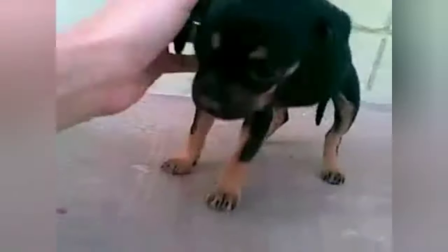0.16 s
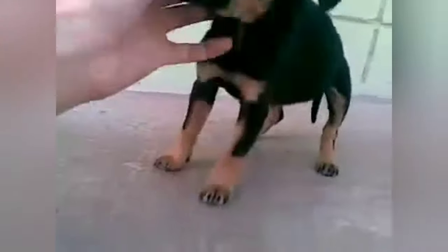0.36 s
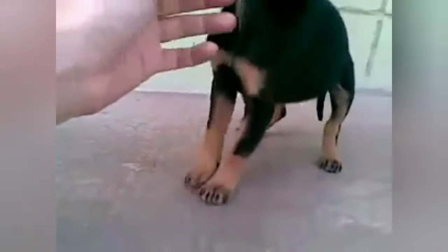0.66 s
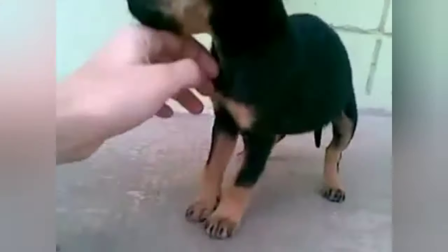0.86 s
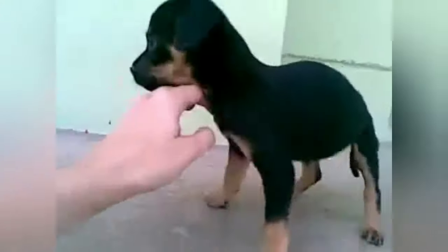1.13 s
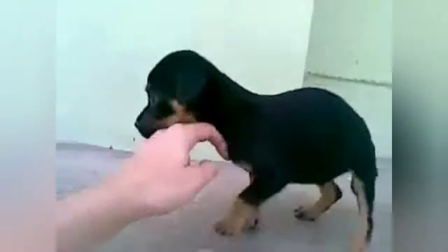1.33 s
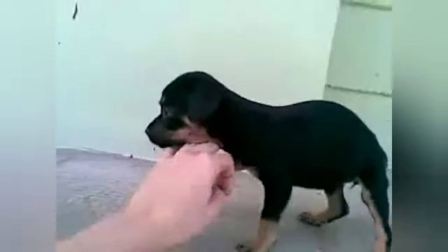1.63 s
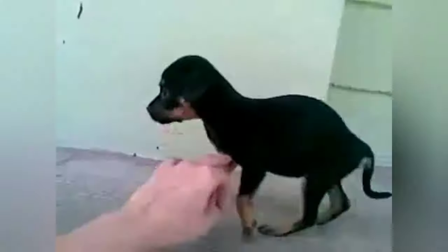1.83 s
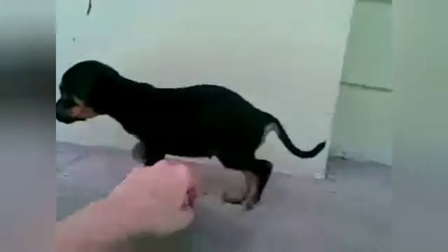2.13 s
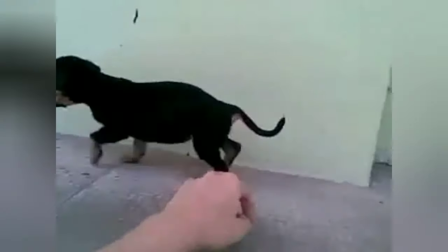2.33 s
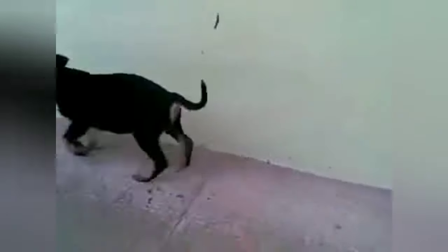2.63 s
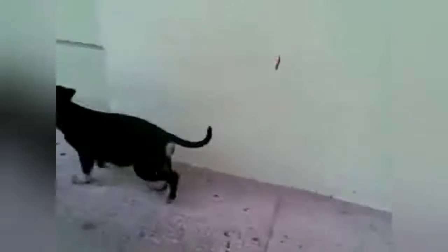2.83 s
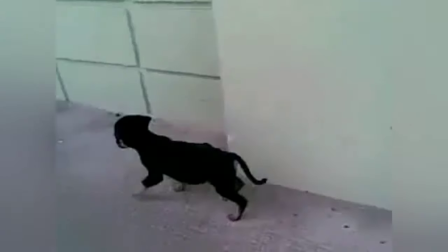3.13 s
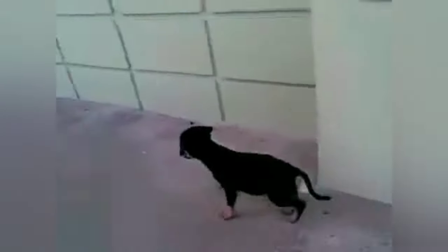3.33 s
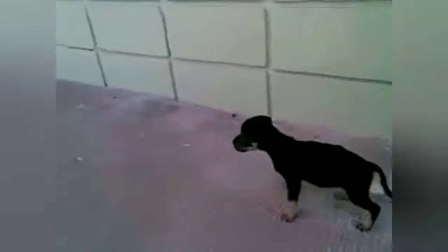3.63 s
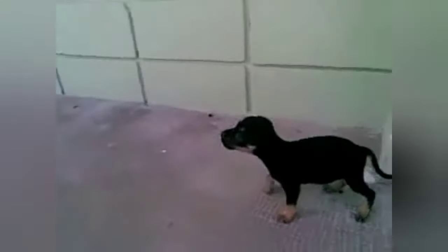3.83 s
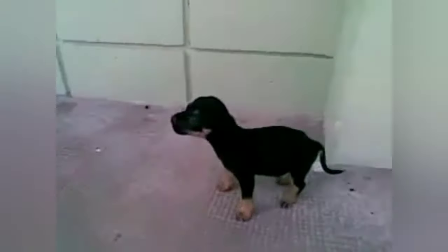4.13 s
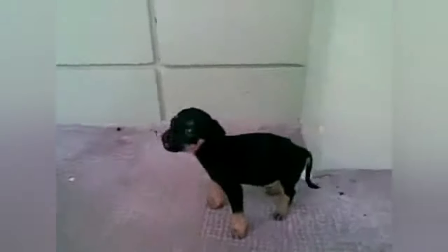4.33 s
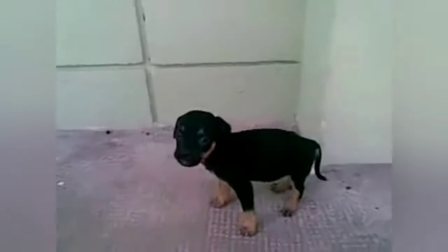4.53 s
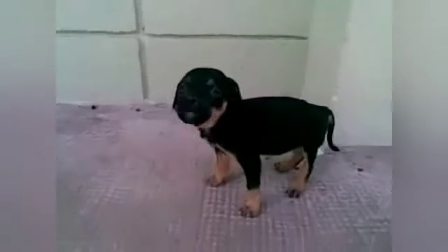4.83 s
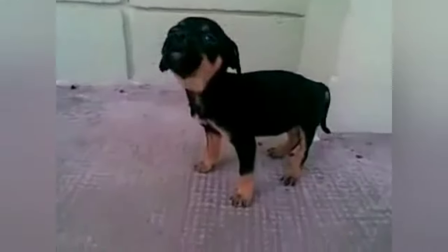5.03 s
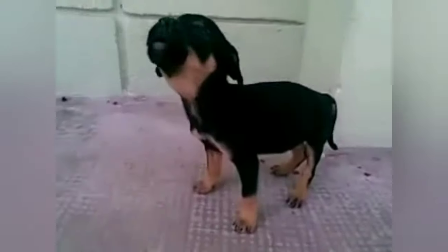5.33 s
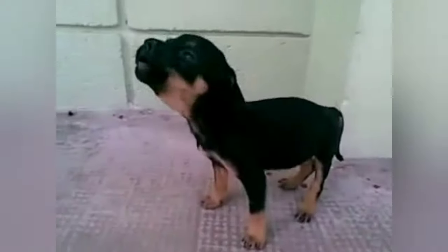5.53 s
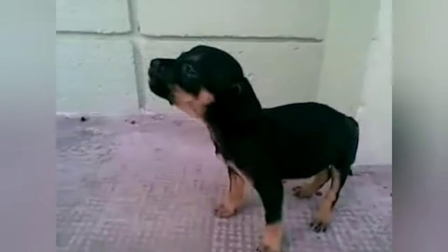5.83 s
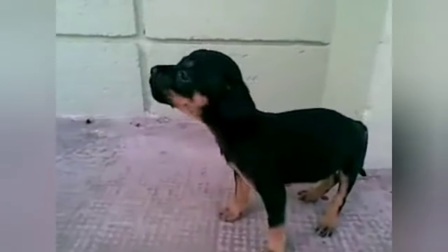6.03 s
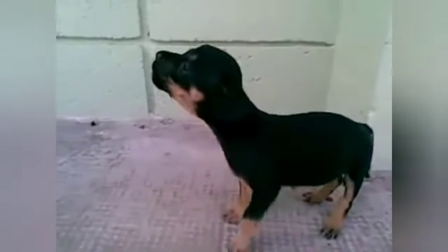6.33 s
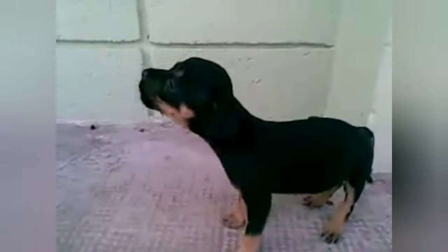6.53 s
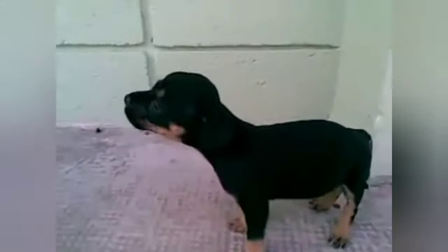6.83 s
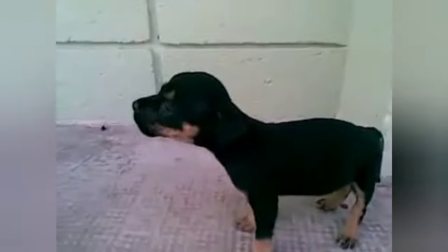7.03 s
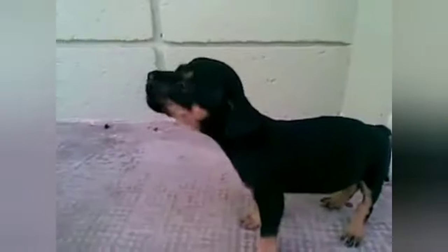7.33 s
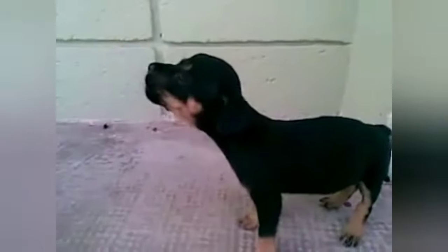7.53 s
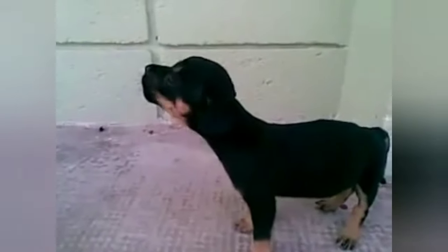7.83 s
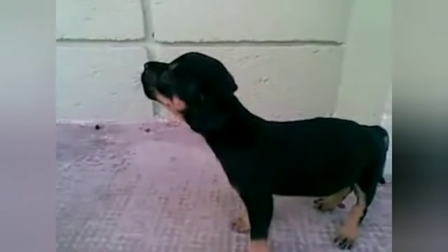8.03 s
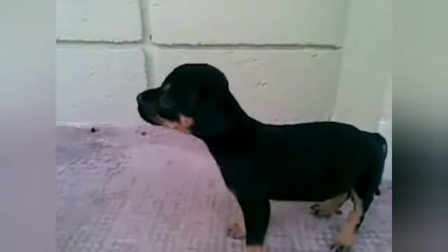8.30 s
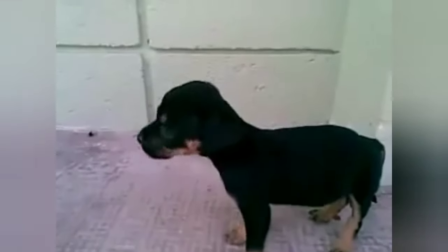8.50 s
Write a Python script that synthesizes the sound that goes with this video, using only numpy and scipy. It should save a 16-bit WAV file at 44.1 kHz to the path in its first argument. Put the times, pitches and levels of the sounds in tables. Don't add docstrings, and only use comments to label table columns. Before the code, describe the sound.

Close, thin puppy whines and sharp yelps on a bare concrete floor, with distant echoing barks, a few claw taps and dull street rumble.

```python
import sys
import numpy as np
from scipy import signal
from scipy.fft import rfft, irfft, next_fast_len
from scipy.io import wavfile
from scipy.ndimage import uniform_filter1d, map_coordinates

SR = 44100
rng = np.random.default_rng(int(sys.argv[2]) if len(sys.argv) > 2 else 0)


def inscribe(sig):
    pcm = np.round(np.clip(np.atleast_2d(sig).T, -1, 1) * 32767)
    wavfile.write(sys.argv[1], SR, pcm.astype(np.int16))


def makeup_ratio(level_db):
    decades = np.asarray(level_db, float) / 20
    return 10 ** decades


N = 381906


def unit(x):
    return x / np.sqrt(np.mean(x ** 2) + 1e-20)


def along(points, hz):
    f, v = np.transpose(points)
    return np.interp(np.log(hz + 1), np.log(f + 1), v)


def curves(rows, t):
    s, *cols = np.transpose(rows)
    return [np.interp(t, s, c) for c in cols]


def wobble(rate, size=N):
    coarse = np.arange(0, size + 32, 32)
    knots = map_coordinates(rng.standard_normal(size // 100 + 4), [coarse * min(rate, 400) / SR])
    return np.interp(np.arange(size), coarse, knots)


def filtered(x, response):
    m = next_fast_len(len(x) + 8192)
    return irfft(rfft(x, m) * response(np.fft.rfftfreq(m, 1 / SR)), m)[:len(x)]


def resonance(f, hz, width_hz):
    return 1j * f * width_hz / (hz * hz - f * f + 1j * f * width_hz)


def rush(spectrum, patchy_db):
    z = signal.stft(rng.standard_normal(N + 512), nperseg=512)[2]
    field = uniform_filter1d(uniform_filter1d(rng.standard_normal(z.shape), 5, 0), 12, 1)
    noise = signal.istft(z * makeup_ratio(patchy_db * unit(field)), nperseg=512)[1][:N]
    return unit(filtered(noise, lambda hz: makeup_ratio(along(spectrum, hz))))


def echoes(x, decay):
    hz, t, z = signal.stft(rng.standard_normal(SR), SR, nperseg=256)
    tail = signal.istft(z * makeup_ratio(-60 * t / along(decay, hz)[:, None]), SR, nperseg=256)[1][:SR]
    return signal.fftconvolve(x, tail / np.linalg.norm(tail))


def street(voice):
    # f/Hz, level/dB per Hz
    rumble_spectrum = [(8.8, -33), (15, -5), (32, -1), (80, 7.5), (103, 2), (130, -3), (173, -7.5),
                       (275, -10), (300, -20), (390, -36), (660, -120)]
    # f/Hz, level/dB per Hz
    traffic_spectrum = [(120, -25.5), (200, -32), (347, -1), (410, -4.5), (528, -4.5), (655, -8.5),
                        (904, -13), (983, -14), (1080, -14), (3500, -30.5), (4550, -38.5), (7700, -120)]
    # f/Hz, level/dB per Hz
    hiss_spectrum = [(1470, -13.5), (2500, 2.5), (3650, -2.5), (4930, -4.5), (7780, -6.5), (9310, -4),
                     (9710, -9.5), (10100, -52), (10500, -26.5), (13600, -83), (22000, -120)]
    # f/Hz, level over the traffic/dB
    hum_lines = [(178, -17), (352, -11), (440, -20), (528, -9), (716, -14), (900, -16.5)]
    # level/dB, ducking at full voice/dB, memory/s
    layers = [
        (-42.5, 2.5, 0.58),
        (-45, 9, 0.41),
        (-65.5, 12, 0.12),
    ]
    duck_from_db, duck_full_db = -39, -12.5
    recede_db_per_s, lag_s = 0.45, 0.13
    t = np.arange(N) / SR
    late_power = np.roll(voice, round(lag_s * SR)) ** 2

    def ducked(db, depth_db, memory):
        power = np.abs(uniform_filter1d(late_power, round(memory * SR)))
        loud_db = 10 * np.log10(power + 1e-12)
        duck = np.clip((loud_db - duck_from_db) / (duck_full_db - duck_from_db), 0, 1.2)
        return db - recede_db_per_s * (t - t.mean()) - depth_db * duck

    rumble_db, traffic_db, hiss_db = [ducked(*layer) for layer in layers]
    hum = sum(makeup_ratio(db + 3.7 * wobble(5.4)) * np.sin(2 * np.pi * hz * t + 1.4 * wobble(7.7))
              for hz, db in hum_lines)
    rumble = makeup_ratio(rumble_db + 3.0 + 0.6 * wobble(4.5)) * rush(rumble_spectrum, patchy_db=1.4)
    traffic = makeup_ratio(traffic_db) * (rush(traffic_spectrum, patchy_db=2.5) + np.sqrt(2) * hum)
    return rumble + traffic + makeup_ratio(hiss_db) * rush(hiss_spectrum, patchy_db=5)


def yip(s, top, end, db, mouth_db):
    rise_s, start_share, soft_db, fade_db, upper_db = 0.048, 0.74, 7, 8, -60.5
    fall = 0.06 * top / 1000
    shape = [(s - rise_s, start_share * top, db - soft_db),
             (s, top, db),
             (s + 0.33 * fall, end + 0.42 * (top - end), db - 0.41 * fade_db),
             (s + fall, end, db - fade_db)]
    return [(*row, mouth_db, upper_db - db) for row in shape]


def spell(t, start, end):
    return np.clip(np.minimum(t - start, end - t) / 0.025 + .5, 0, 1)


def mouth(t, hz):
    # start t/s, widest t/s, end t/s, peak level/dB, f/Hz
    gapes = [(2.688, 2.757, 3.0, -63, 5800), (3.016, 3.073, 3.146, -45, 5200),
             (3.096, 3.194, 3.6, -60, 5820), (3.426, 3.49, 3.66, -43, 4250), (3.49, 3.56, 3.72, -53, 5600),
             (4.45, 4.718, 4.8, -55.5, 2810), (4.9, 5.023, 5.17, -57, 4520), (6.95, 7.12, 7.4, -46, 2290),
             (8.219, 8.4, 8.66, -63, 4050), (8.36, 8.48, 8.6, -60, 2780), (5.93, 6.028, 6.12, -39, 4400),
             (6.04, 6.076, 6.13, -49, 3220), (6.25, 6.505, 6.62, -34, 2660),
             (6.706, 7.055, 7.2, -38.5, 3140), (7.05, 7.155, 7.25, -49, 3690),
             (7.848, 7.932, 8.3, -56, 2330)]
    swell_db = 25
    size = 0
    for start, widest, end, db, gape_hz in gapes:
        if t[0] < end and start < t[-1]:
            width_hz = (0.4 if gape_hz > 4000 else 0.085) * gape_hz
            closed = np.interp(t, [start, widest, end], [1, 0, 1])
            during = (start < t) * (t < end)
            size = size + makeup_ratio(db - swell_db * closed) * during * np.abs(resonance(hz, gape_hz, width_hz)) ** 2
    return size


def ring_db(t, hz):
    # start t/s, end t/s, f/Hz, level/dB
    rings = [(3.7, 4.62, 6250, 11.5), (4.15, 4.6, 8000, 6.5), (3.5, 4.3, 6400, -7), (5.15, 8.7, 4400, -5.5),
             (6.5, 6.82, 8150, 5), (6.25, 6.48, 9200, 4), (5.99, 6.055, 8900, 4), (6.05, 6.11, 7450, 13),
             (5.96, 6.02, 7200, 8), (6.12, 7.05, 7500, -10), (6.12, 6.75, 9700, -7), (5.2, 6.0, 7300, 3),
             (6.6, 7.9, 4850, 6.5), (8.25, 8.64, 7960, -16), (6.7, 8.47, 6000, -12), (6.3, 7.05, 5600, 7),
             (3.1, 3.66, 7400, 8), (3.095, 3.16, 6600, -15), (3.035, 3.056, 5300, -14),
             (3.035, 3.056, 4000, -10), (3.035, 3.056, 6700, -10), (3.12, 3.2, 3900, -10),
             (3.18, 3.29, 4500, -8), (3.42, 3.46, 5900, -7), (3.44, 3.495, 5500, -16),
             (3.46, 3.478, 7000, 6), (3.48, 3.495, 7100, 6), (3.6, 3.65, 7200, 8), (3.6, 3.72, 5700, -10),
             (3.61, 3.65, 4750, 7), (3.2, 3.9, 9300, -12), (4.9, 5.95, 8700, -17), (5.06, 5.15, 9600, -5),
             (.65, .95, 2750, -12), (.65, .95, 4750, 5), (.65, .95, 5800, -10), (.04, .26, 4600, 5),
             (6.75, 7.02, 2420, -12), (6.525, 6.55, 2480, -8), (5.3, 6.05, 4250, 7),
             (5.2, 5.97, 5000, -8.5), (4.97, 5.07, 6330, 9), (4.99, 5.04, 5600, -10), (2.7, 2.8, 5300, -12),
             (3.9, 6.0, 3700, 3), (5.3, 5.6, 7200, -8), (8.45, 8.6, 2900, 5), (7.05, 7.2, 5000, -8),
             (6.07, 6.13, 4200, -10)]
    width = 0.079
    return sum(db * spell(t, start, end) * np.exp(-(np.log(hz / ring_hz) / width) ** 2)
               for start, end, ring_hz, db in rings if t[0] < end and start < t[-1])


def tripling(t, partial, second_db):
    # start t/s, end t/s, level under 2nd partial/dB, extra above it/dB
    spells = [
        (3.846, 4.724, -11, -8.5),
        (5.199, 5.771, -15.5, -0.5),
        (6.122, 6.479, -14.5, -3.5),
    ]
    # thirds of the pitch, level/dB
    sidebands = [(4, -16), (5, 0), (7, -13), (8, -8), (10, -28)]
    blur = 1.2 * np.cos(.85 * wobble(60, size=len(t)))
    lines = 0
    for begin, end, side_db, above_db in spells:
        if t[0] < end and begin < t[-1]:
            comb = sum(partial(k / 3, second_db + side_db + (k > 6) * above_db + db, 2.4) for k, db in sidebands)
            lines = lines + blur * spell(t, begin, end) * comb
    return lines


def vocal_call(rows, nasal_db, air, t):
    # f/Hz, level under the call/dB
    nose = [(1900, -11), (2400, -17.5), (2800, -25), (3150, -27.5), (3700, -47.5), (4100, -65.5),
            (4700, -48), (9000, -92)]
    # f/Hz, level/dB
    muzzle = [(3000, -2), (4400, 0), (5300, -3), (6200, 1), (7200, -4), (8200, -2), (9000, -1), (9700, -8)]
    shrill_hz, shrill_loss_db, shrill_top_hz = 1122, 15.5, 7700
    smear_loss_db, smear_per_s = 2, 12
    steady_db, unsteady_db = 1.5, 2.3
    hoarse = .24
    size = len(t)
    hz, level_db, mouth_db, effort_db = curves(rows, t)
    first_db = level_db - 10 * np.log10(1 + makeup_ratio(mouth_db) ** 2)
    second_db, upper_db = first_db + mouth_db, level_db + effort_db

    slope = np.gradient(np.log(hz)) * SR
    glide = np.clip(uniform_filter1d(np.abs(slope), 2000) / 0.54, 0, 1)
    smear_db = smear_loss_db * np.clip(uniform_filter1d(slope, 600) / smear_per_s, 0, 1)
    jitter = .002 * wobble(40, size=size) + (0.002 + .005 * glide) * wobble(200, size=size)
    hz = uniform_filter1d(hz, 450) * (1 + jitter)
    phase = 2 * np.pi * np.cumsum(hz) / SR

    def partial(k, db, shake_db):
        level = makeup_ratio(db + shake_db * wobble(44.83, size=size))
        return np.sqrt(2) * level * np.sin(k * phase + k * k)

    call = partial(1, first_db, 1.0) + partial(2, second_db, 1.0)
    rasp = 1 + hoarse * glide * (1.5 * wobble(260, size=size) - 1)
    for k in range(3, 6):
        middle = makeup_ratio(level_db + nasal_db + along(nose, k * hz)) * (k < 5) + mouth(t, k * hz)
        drift_db = 3 * glide * wobble(18, size=size) - 2 * glide - smear_db * (k > 3)
        call += rasp * middle * partial(k, ring_db(t, k * hz) + drift_db, 1.3 + 1.7 * glide)

    shrill_db = shrill_loss_db * np.clip((hz - shrill_hz) / 60, 0, 1)
    sway_db = steady_db + unsteady_db * glide
    for k in range(5, 14):
        db = upper_db - smear_db - 8.0 - shrill_db * (k * hz > shrill_top_hz)
        db = db + along(muzzle, k * hz) + ring_db(t, k * hz)
        db = db + sway_db * np.clip(wobble(9.2, size=size), -3, 1)
        call += rasp * partial(k, db, sway_db) * (k * hz < 9700)

    call += tripling(t, partial, second_db)
    call += makeup_ratio(upper_db - 20 + 12 * glide) * air
    call *= 1 + makeup_ratio(-24.5) * unit(uniform_filter1d(rng.standard_normal(size), 40))
    return call * np.minimum(1, np.minimum(t - t[0], t[-1] - t) / .008)


def puppy():
    # f/Hz, level/dB per Hz
    breath = [(1800, -54.5), (3000, -14.5), (4500, -15.5), (7000, 1), (9300, -10), (9800, -64.5)]
    # f/Hz, decay t60/s
    nook = [(500, 0.8), (3000, 0.47), (9000, 0.01)]
    # top t/s, top f/Hz, end f/Hz, level/dB, mouth opening/dB
    yips = [
        (1.714, 854, 745, -37, -9.5),
        (2.055, 1126, 1054, -40, -18),
        (2.416, 1063, 872, -43, -7),
        (2.751, 1380, 1008, -42.5, -18),
    ]
    # t/s, f/Hz, level/dB, mouth opening (2nd over 1st partial)/dB, effort (upper over level)/dB
    whimper_1 = [(.034, 1048, -31, -27, -37), (.05, 925, -31, -26, -35), (.1, 970, -32, -20, -34),
                 (.16, 889, -32.5, -8, -27), (.232, 874.4, -29, -13.5, -28.5),
                 (.256, 843, -53, -7.5, -13.5)]
    # t/s, f/Hz, level/dB, mouth opening/dB, effort/dB
    whimper_2 = [(.66, 782, -44, -32, -36), (.68, 692, -31, -37, -43.5), (0.726, 663, -29, -36, -43.5),
                 (0.744, 770, -30, -20, -48), (0.758, 705, -26.5, -30, -41), (.8, 705, -28, -35, -37),
                 (0.864, 679, -29, -41, -38.5), (.904, 659, -30.5, -49, -30.5), (0.943, 633, -54, -27, -18)]
    # t/s, f/Hz, level/dB, mouth opening/dB, effort/dB
    whimper_3 = [(7.745, 936, -40.5, 1, -30), (7.772, 1014, -45, 2, -28), (7.8, 1015, -45, 13, -17.5),
                 (7.885, 789, -35, -2.5, -32), (7.956, 756, -38, -7, -25.5), (7.968, 780, -66, -7, -28)]
    # t/s, f/Hz, level/dB, mouth opening/dB, effort/dB
    whimper_4 = [(8.241, 934, -55, -11, -15.5), (8.26, 955, -36, -9.5, -24.5),
                 (8.297, 1053, -40.5, -2.5, -11.5), (8.409, 918, -36, 19, -16.5),
                 (8.456, 917, -35, 21, -17), (8.521, 969, -35, 10, -19), (8.586, 1017, -37, -2.5, -15.5),
                 (8.597, 949, -39.5, 5, -16.5), (8.614, 925, -37.5, 5, -17.5), (8.63, 870, -64, -23, -23)]
    # t/s, f/Hz, level/dB, mouth opening/dB, effort/dB
    yelp_1 = [(3.011, 1185, -63, -3, -4), (3.028, 1205, -44, -6, -5.5), (3.048, 1362, -34, -15, -21),
              (3.061, 1483, -27, -18, -27.5), (3.074, 1478, -29.5, -16.5, -30),
              (3.128, 1286, -44, -23, -14.5), (3.231, 1103, -40, -34, -19), (3.286, 1064, -42, -20, -26)]
    # t/s, f/Hz, level/dB, mouth opening/dB, effort/dB
    yelp_2 = [(3.424, 1046, -41.5, -23, -14), (3.445, 1082, -36, -15, -12.5),
              (3.476, 1356, -24, -14.5, -21.5), (3.497, 1517, -29.5, -26, -15),
              (3.51, 1518, -35.5, -28.5, -17), (3.555, 1397, -33.5, -17.5, -16),
              (3.628, 1193, -42, -17.5, -13), (3.69, 1053, -37.5, -24, -23.5),
              (3.766, 1040, -42.5, -40, -24)]
    # t/s, f/Hz, level/dB, mouth opening/dB, effort/dB
    whine_1 = [(3.805, 1056, -22.5, -22, -28.5), (3.865, 1034, -29, -6, -28), (3.96, 1025, -26, -9.5, -32),
               (4.085, 1020, -24, -16.5, -36.5), (4.429, 988, -23.5, -14, -36.5),
               (4.648, 955, -27, -12.5, -40.5), (4.72, 935, -36, -1, -35), (4.779, 936, -45, -29, -41)]
    # t/s, f/Hz, level/dB, mouth opening/dB, effort/dB
    yip_into_whine = [(4.935, 952, -54, -1, -21), (4.965, 1040, -49.5, -9, -11), (5.0, 1109, -53, 0, -10.5),
                      (5.05, 1122, -52, -3, -8), (5.095, 1003, -46.5, -8, -21.5)]
    # t/s, f/Hz, level/dB, mouth opening/dB, effort/dB
    whine_2 = [(5.136, 911, -40, -9.5, -37.5), (5.203, 956, -30, 0.5, -39),
               (5.377, 934, -26.5, -3.5, -38.5), (5.436, 922, -28.5, 2.5, -40),
               (5.616, 916.3, -28.5, 0.5, -37.5), (5.739, 916, -33, 5, -42), (5.811, 820, -57, -29.5, -33)]
    # t/s, f/Hz, level/dB, mouth opening/dB, effort/dB
    yelp_3 = [(5.965, 848, -54.5, -26, -32), (5.992, 1002, -45.5, 21.5, -1.5), (6.012, 1113, -36.5, -5, -9),
              (6.045, 1115, -34.5, 14, -13.5), (6.079, 1066, -27, 12.5, -26.5),
              (6.124, 1032, -38.5, 0.5, -31), (6.15, 981, -32.5, 21.5, -29.5)]
    # t/s, f/Hz, level/dB, mouth opening/dB, effort/dB
    whine_3 = [(6.249, 959, -28.5, 7, -36.5), (6.4, 924, -27.5, 12.5, -37), (6.508, 888, -24.5, 6, -36.5),
               (6.528, 826, -22.5, 11, -43), (6.707, 801, -31, 1, -39), (6.992, 809, -29, 5, -40.5),
               (7.066, 782.5, -37, 13.5, -30.5), (7.116, 765, -33.5, -3.5, -32), (7.211, 694, -44, -4, -33)]
    whimpers = [whimper_1, whimper_2, whimper_3, whimper_4, yelp_1] + [yip(*row) for row in yips]
    whines = [yelp_2 + whine_1, yip_into_whine + whine_2, yelp_3 + whine_3]
    calls = [(rows, -10.5) for rows in whimpers]
    calls += [(rows, 0) for rows in whines]
    voice, air = np.zeros(N), rush(breath, patchy_db=4)
    for rows, nasal_db in calls:
        start, size = round(rows[0][0] * SR), round((rows[-1][0] - rows[0][0]) * SR)
        t = (start + np.arange(size)) / SR
        voice[start:start + size] += vocal_call(rows, nasal_db, air[start:start + size], t)
    return voice + makeup_ratio(-21) * echoes(voice, nook)[:N]


def far_dogs():
    # t/s, level/dB, length/s, throat f/Hz, mouth f/Hz
    hoarse_barks = [(8.018, -54, 0.08, 985, 710), (0.443, -38.5, 0.18, 712, 365),
                    (0.461, -40.5, 0.25, 488.6, 775), (2.041, -33.5, 0.12, 639, 366),
                    (3.722, -30, 0.19, 664.5, 1200), (3.998, -38.5, 0.065, 458.6, 690),
                    (4.649, -37, .13, 898.7, 1083), (7.409, -33, 0.11, 715, 1383),
                    (8.297, -44.5, 0.21, 950, 1350), (5.876, -39, 0.2, 641.5, 412),
                    (6.115, -38, 0.21, 611.6, 387), (6.33, -27.5, 0.14, 876.8, 1650),
                    (7.322, -29, 0.0975, 791.5, 1027), (7.524, -28.5, .19, 684.6, 1045),
                    (8.146, -40.5, 0.14, 847, 1035), (8.187, -28, .11, 822, 1360),
                    (8.207, -35, 0.086, 1152, 1650), (8.385, -40.5, 0.22, 410, 756)]
    # t/s, level/dB, throat f/Hz, throat width/Hz, mouth f/Hz
    woofs = [(.66, -43, 372, 151, 523), (2.11, -33.5, 449.7, 176, 584), (4.641, -36.5, 423, 100.3, 843),
             (4.7, -35, 417.9, 60.6, 744), (4.9, -51, 426.4, 44.7, 916), (6.7, -39, 425, 186.4, 1056),
             (7.169, -43.5, 447.2, 199.5, 752), (7.559, -35, 514, 71, 710)]
    # f/Hz, decay t60/s
    yard = [(300, 1.0), (1000, 1), (2500, 0.22), (6000, 0.73)]
    bark_width_hz, woof_s = 300, 0.1703
    calls = [(*row, bark_width_hz) for row in hoarse_barks]
    calls += [(s, db, woof_s, hz, mouth_hz, width_hz) for s, db, hz, width_hz, mouth_hz in woofs]
    barks, t = np.zeros(N + 2 * SR), np.arange(SR // 2) / SR
    for s, db, length, throat_hz, mouth_hz, width_hz in calls:
        u = np.clip(t / length, 0, 1)
        pitch_hz = throat_hz / np.ceil(throat_hz / 550)
        arch = .86 + .2 * np.sin(np.pi * u ** .8) + 0.0615 * wobble(149.4, size=len(t))
        cycles = np.cumsum(pitch_hz * arch) / SR
        gate = np.exp(4 * (np.cos(2 * np.pi * cycles) - 1))
        pulses = unit(gate ** 6 - np.mean(gate ** 6))
        source = pulses + 4.83 * unit(gate * rng.standard_normal(len(t)))

        def tract(f):
            upper = 0.4 * resonance(f, mouth_hz, 280) ** 2 - 0.069 * resonance(f, 1470, 600)
            upper = upper + 0.064 * resonance(f, 2240, 400) - 0.0095 * resonance(f, 2700, 1100)
            throat = resonance(f, throat_hz, width_hz) ** 2
            lips = f ** 2 / (f ** 2 + 300 ** 2)
            return (throat - np.sqrt(width_hz / bark_width_hz) * upper) * lips

        bark = unit(filtered(source, tract)) * np.sin(np.pi * u ** .62) ** 1.1
        heard = echoes(bark, yard)
        heard[:len(t)] += 0.63 * bark
        barks[round(s * SR):][:len(heard)] += makeup_ratio(db + 1.0) * heard
    return barks[:N]


def paws():
    # t/s, peak level/dB, f/Hz, decay t60/s
    claws = [
        (2.953, -46, 484, 0.043),
        (3.322, -27.5, 1614, 0.016),
        (3.343, -40, 6030, 0.0045),
        (3.428, -35.5, 2100, 0.0098),
        (4.662, -22, 326.4, 0.21),
        (5.248, -26, 293.4, 0.12),
        (7.38, -39.5, 1520, 0.0094),
    ]
    # t/s, half length/s, level/dB
    scuff = (3.322, .026, -65)
    taps, t = np.zeros(N), np.arange(6000) / SR
    for s, db, hz, t60 in claws:
        onset = 1 - np.exp(-t / (.1 * t60))
        taps[round(s * SR):][:len(t)] += makeup_ratio(db - 60 * t / t60) * np.sin(2 * np.pi * hz * t) * onset
    s, width, db = scuff
    rustle = rush([(7000, -40), (9300, -6), (10000, 0), (10800, -1), (11300, -8), (11700, -60)], patchy_db=2)
    return taps + makeup_ratio(db) * rustle * np.exp(-((np.arange(N) / SR - s) / width) ** 6)


def masking(x, above_hz, below_hz):
    # f/Hz, level/dB
    masked = [(1100, -50), (1250, -39), (2050, -40), (2250, -33), (2700, -32), (3500, -31), (4600, -28),
              (6600, -23.5), (7200, -16), (7800, -12), (8600, -13), (9300, -18), (9750, -17), (9900, -32)]
    # f/Hz, level/dB
    starved = [(3000, -90), (3600, -70), (5000, -66), (9600, -66)]
    hz, _, z = signal.stft(x, SR, window="cosine", nperseg=2048)
    away = np.arange(-40, 41) * hz[1]
    spread = np.exp(-np.abs(away) / np.where(away > 0, above_hz, below_hz))
    masker = signal.fftconvolve(np.abs(z) ** 2, spread[:, None], mode="same", axes=0)
    limit = makeup_ratio(along(masked, hz))[:, None] * np.sqrt(np.abs(masker))
    limit += makeup_ratio(-101) * (hz[:, None] > 9750)
    limit += makeup_ratio(along(starved, hz))[:, None] * np.linalg.norm(z[hz > 300], axis=0)
    kept = uniform_filter1d(np.abs(z) ** 2, size=3, axis=0) > limit ** 2
    return signal.istft(z * kept, SR, window="cosine", nperseg=2048)[1][:N]


def scene():
    voice = puppy()
    return np.tile(street(voice) + voice + far_dogs() + paws(), (2, 1))


def roll_off(x):
    return signal.sosfilt(signal.butter(12, 15700, fs=SR, output="sos"), x)


def record(dry):
    mono = masking(dry[0], above_hz=400, below_hz=150)
    mono = mono + makeup_ratio(-90) * rush([(11200, -60), (11800, 0), (15500, -4), (15800, -60)], patchy_db=3)
    side = makeup_ratio(-11.0) * np.roll(filtered(mono, lambda hz: hz > 3400), 700)
    return roll_off(np.array([mono + side, mono - side]))


dry = scene()
out = record(dry)
inscribe(out)
```